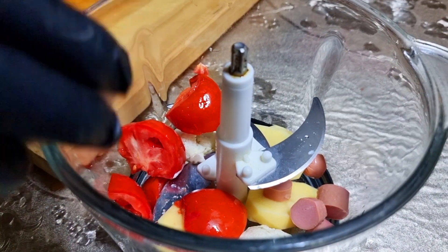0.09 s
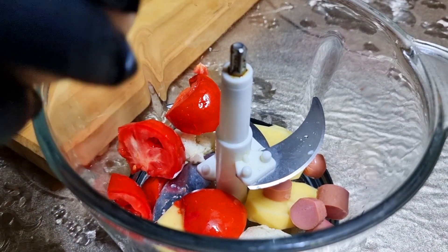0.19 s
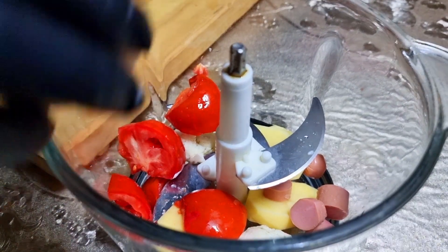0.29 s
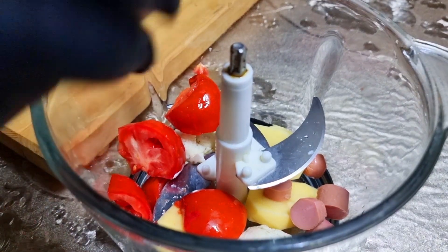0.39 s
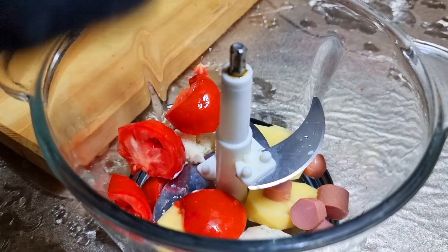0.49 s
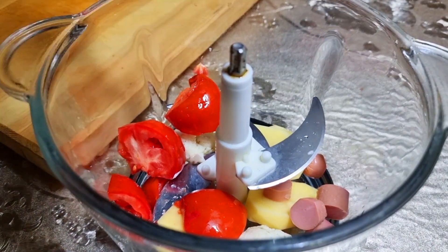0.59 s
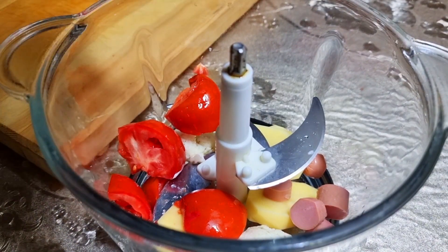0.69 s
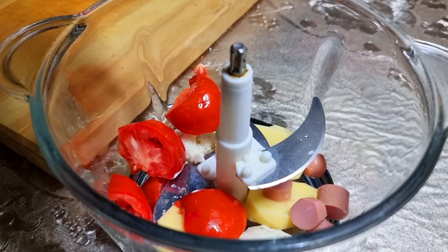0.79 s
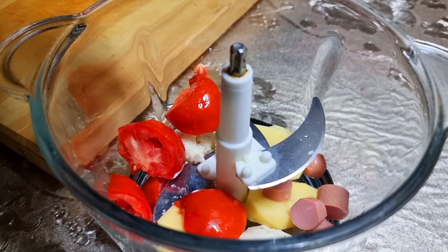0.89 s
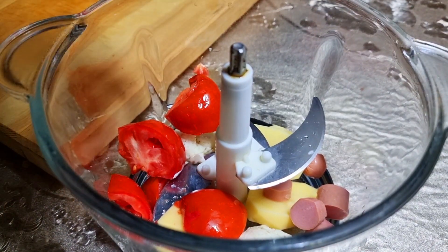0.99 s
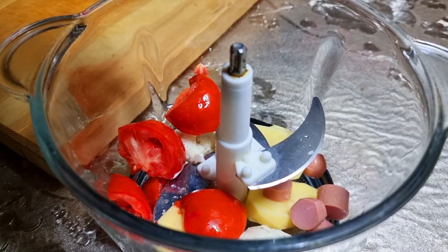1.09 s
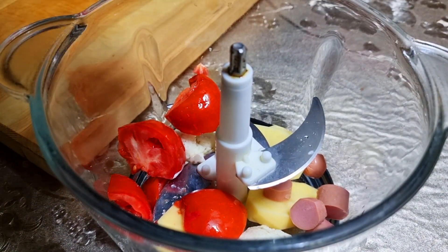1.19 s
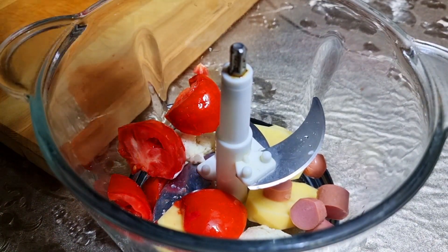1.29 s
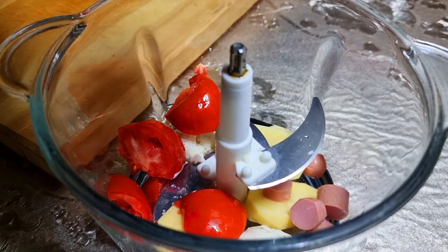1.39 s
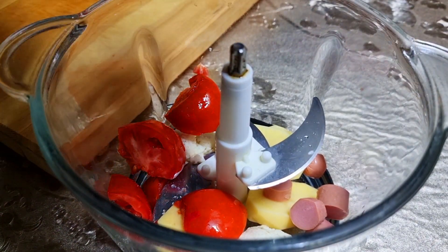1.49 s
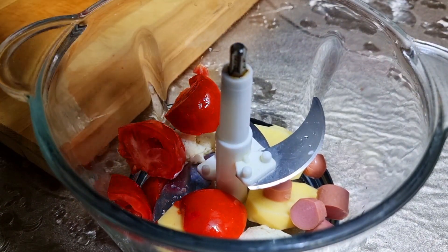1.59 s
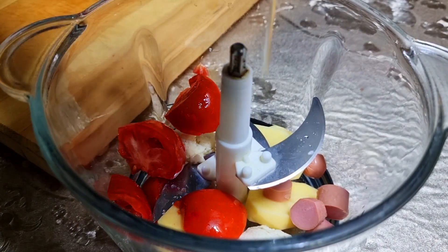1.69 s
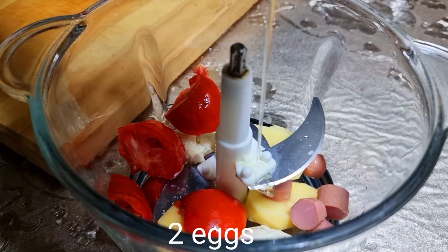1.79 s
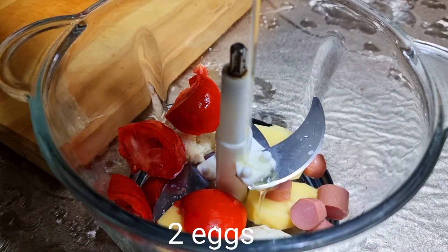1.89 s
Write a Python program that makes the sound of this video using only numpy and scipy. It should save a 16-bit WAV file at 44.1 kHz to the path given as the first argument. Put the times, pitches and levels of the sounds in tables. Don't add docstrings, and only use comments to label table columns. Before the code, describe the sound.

An egg is cracked on a thick glass bowl, close in stereo, in a quiet, slightly echoing kitchen. After a faint sleeve rustle, a dull knock at 0.22 s and a brighter, clickier one at 0.39 s thud the board, rattle loose things and leave the glass ringing with a wavering tone. Cloth brushes softly around 0.8-0.9 s. Shell crackles at 1.26-1.53 s, again near 1.7 s, then snaps sharply at 1.88 s.

```python
import sys
import numpy as np
from scipy import signal
from scipy.fft import rfft, irfft, next_fast_len
from scipy.io import wavfile
from scipy.ndimage import uniform_filter1d

SR = 44100
rng = np.random.default_rng(int(sys.argv[2]) if len(sys.argv) > 2 else 0)


def output_pcm(signal):
    pcm = np.clip(np.atleast_2d(signal).T, -1, 1) * 32767
    wavfile.write(sys.argv[1], SR, np.round(pcm).astype(np.int16))


def ratio(d):
    e = np.asarray(d, float) / 20
    return 10 ** e


N = 83790

# (time [s], click level [dB], thud level [dB], click pitch [Hz])
KNOCKS = [
    (0.2165, -15.5, -18.5, 720),
    (0.3863, -3.5, -19, 9550),
]
FIRST_S, SECOND_S = KNOCKS[0][0], KNOCKS[1][0]
# (pitch [Hz], first knock [dB], second knock [dB], 60 dB decay [s])
BOARD = [(108.7, -9.5, -5.5, 0.4), (154, -21, -15, 0.32), (205.6, -1.5, -7.5, 0.21),
         (234.6, -3, -17.5, 0.21), (390, 0, -11.5, 0.075), (451, -4, -15, 0.087)]
BOARD_SOFT_HZ = 410


def at_hz(points, hz):
    points = np.array(points)
    return np.interp(np.log(hz), np.log(points[:, 0]), points[:, 1])


def rms_one(x):
    return x / np.sqrt(np.mean(x ** 2) + 1e-20)


def since(s):
    t = np.arange(N) / SR - s
    return np.maximum(t, 0), t >= 0


def sos_filter(x, order, hz, kind):
    return signal.sosfilt(signal.butter(order, hz, kind, fs=SR, output="sos"), x)


def soften(x, hz):
    return signal.lfilter(*signal.butter(1, hz, fs=SR), x)


def struck(s, hz, db, t60, pan_db, lead):
    out, i = np.zeros((2, N)), int(s * SR)
    t = np.arange(min(N - i, int(1.6 * t60 * SR))) / SR
    swell = ratio(db - 60 * t / t60) * np.minimum(t / 0.0019, 1)
    sides = ratio(np.array([[pan_db], [-pan_db]]) / 2)
    phase = 2 * np.pi * hz * t + np.array([[lead], [0]])
    out[:, i:i + len(t)] = swell * sides * np.sin(phase)
    return out


def bands():
    # (pitch [Hz], likeness [-1 to 1])
    likeness = [(60, 0.41), (300, 0.94), (1000, 0), (4000, 0.), (12000, 0.)]
    edges = 22 * 2 ** np.arange(0, 10, .5)
    white = rng.standard_normal((2, 2, N))
    for k, (low, high) in enumerate(zip(edges, edges[1:])):
        mid, side = sos_filter(white[k % 2], 2, [low, high], "band")
        hz = np.sqrt(low * high)
        alike = np.clip(at_hz(likeness, hz), -1, 1)
        yield hz, np.sqrt(1 + alike) * mid + np.sqrt(1 - alike) * side * [[1], [-1]]


def colour(x, tone):
    hz = np.maximum(np.arange(1025) * SR / 2048, 20)
    c = irfft(np.log(ratio(at_hz(tone, hz))))
    c[1:1024] *= 2
    c[1025:] = 0
    h = irfft(np.exp(rfft(c)))
    return signal.fftconvolve(x, h[None] / np.sqrt(np.sum(h ** 2)))[:, :N]


def resonate(x, hz, cycles):
    r, w = ratio(-60 * hz / (cycles * SR)), 2 * np.pi * hz / SR
    return signal.lfilter([0, np.sin(w)], [1, -2 * r * np.cos(w), r * r], x)


def kitchen(x):
    t60_s, wall_cut_hz = 0.44, 2900
    size = next_fast_len(N + SR // 2)
    w = 2 * np.pi * np.arange(size // 2 + 1) / size
    dull = 1 / (1 + 1j * w * SR / (2 * np.pi * wall_cut_hz))
    out = np.zeros((2, len(w)), complex)
    for k, lag in enumerate(rng.uniform(0.01, 0.052, 12) * SR):
        loop = ratio(-60 * lag / SR / t60_s) * dull * np.exp(-1j * w * lag)
        out[k % 2] += (-1) ** (k // 2) * loop / (1 - loop)
    return irfft(out * rfft(x, size), size)[:, :N]


def room_air():
    # (pitch [Hz], level per Hz [dB])
    air_tone = [(25, -27), (110, -10.5), (200, -21.5), (500, -13), (840, -5.5), (1700, -10), (4000, -7),
                (9000, -13.5)]
    air_db, top_hz, above_db = -65.5, 11280, -19.5
    air = sum(ratio(at_hz(air_tone, hz)) * noise for hz, noise in bands())
    low = signal.sosfilt(signal.cheby2(10, 50, top_hz, fs=SR, output="sos"), air)
    return ratio(air_db) * rms_one(low + ratio(above_db) * air)


def sleeve():
    # (time [s], level [dB], half width [s])
    strokes = [
        (0.124, -60.5, 0.03),
        (0.38, -51, .004),
        (0.819, -65, 0.026),
        (0.899, -61.5, 0.021),
        (0.914, -56.5, 0.0023),
    ]
    # (pitch [Hz], level per Hz [dB])
    cloth_tone = [(1500, -21), (3000, -6), (4800, 0), (7000, 4), (10000, -16), (15000, -38.5)]
    cloth = sum(ratio(at_hz(cloth_tone, hz) - 30 * (hz < 1000)) * noise for hz, noise in bands())
    t = np.arange(N) / SR
    rubbing = sum(ratio(db) * np.exp(-((t - s) / width) ** 2) for s, db, width in strokes)
    return rubbing * rms_one(cloth)


def bumps():
    # (time [s], level [dB])
    touches = [
        (.1, -66.5),
        (1.282, -69),
    ]
    hz, _, _, t60 = BOARD[0]
    out = sum(struck(s, hz, db, t60 / 2, 0, 0)[0] * np.minimum(since(s)[0] / 0.0058, 1)
              for s, db in touches)
    return soften(out, BOARD_SOFT_HZ)


def rattle():
    # (pitch [Hz], first knock [dB], second knock [dB], 60 dB decay [s])
    shaking = np.array([(59, -44, -41, 0.23), (204, -33, -37, 0.29), (463, -30, -38.5, 0.1),
                        (1192, -27, -27, 0.079), (2430, -43, -28, 0.08), (5060, -57.5, -25.5, 0.088),
                        (8000, -41.5, -31.5, 0.023), (13000, -60.5, -47, 0.041)])
    out = 0
    for hz, noise in bands():
        for k, knock in enumerate(KNOCKS):
            t, on = since(knock[0])
            db = at_hz(shaking[:, [0, 1 + k]], hz) - 60 * t / at_hz(shaking[:, [0, 3]], hz)
            out = out + (hz > 35) * on * ratio(db) * np.minimum(t * hz / 2, 1) * rms_one(noise)
    gap = sos_filter(out, 3, [4500, 5600], "bandstop")
    return np.where(since(SECOND_S)[1], (out + gap) / 2, gap)


def push():
    lag_s, width_s, hz, push_db = .0132, 0.0041, 116, -1.5
    out = 0
    for s, _, thud_db, _ in KNOCKS:
        t = np.arange(N) / SR - s - lag_s
        pulse = np.exp(-(t / width_s) ** 2) * np.cos(2 * np.pi * hz * t)
        out = out + ratio(thud_db + push_db) * pulse
    return out


def board():
    lag_s, wobble_db = 0.0016, 3
    lead_s = 0.0001
    settle_s, settle_db_per_s = 0.48, 147
    settling = settle_db_per_s * since(settle_s)[0]
    out = np.zeros((2, N))
    for k, (hz, *levels, t60) in enumerate(BOARD):
        wobble = rms_one(np.interp(np.arange(N) / SR * 40, np.arange(80), rng.standard_normal(80)))
        lead = 2 * np.pi * hz * lead_s
        thuds = sum(struck(s + lag_s, hz, thud_db + db, t60, 0, lead)
                    for (s, _, thud_db, _), db in zip(KNOCKS, levels))
        out += (-1) ** k * ratio(wobble_db * wobble - settling) * thuds
    return soften(out, BOARD_SOFT_HZ)


def bowl_pair():
    # (pitch [Hz], level [dB], 60 dB decay [s], change at second knock [dB])
    pair = [(829.4, -9, 1.05, -4), (848.3, -21, 1.0, 2)]
    # (left minus right [dB], left lead [radians])
    pair_aim = [(-3.8, -2.86), (2.2, 1.4)]
    lags_s = (0, .00015)
    change = np.minimum(since(SECOND_S)[0] / 0.015, 1)
    out = 0
    for (hz, db, t60, step_db), aim, lag in zip(pair, pair_aim, lags_s):
        out = out + struck(FIRST_S + lag, hz, db, t60, *aim) * ratio(step_db * change)
    return out


def bowl_overtones():
    # (first knock [dB], second knock [dB], 60 dB decay [s])
    glass = [(-36, -26, .56), (-43.5, -33.5, .5), (-29.5, -32, 0.28), (-22, -17.5, 0.21), (-40, -42, 0.11),
             (-38.5, -34, 0.14), (-31, -32, .1), (-32.5, -20, 0.1), (-40, -33.5, .11), (-32.5, -32.5, 0.15),
             (-47, -33.5, .11), (-36.5, -26.5, 0.1), (-35.5, -29, 0.11), (-54, -29, 0.11)]
    # (pitch [Hz], left minus right [dB], left lead [radians])
    glass_aim = [(2029, 4.2, -1.9), (2194.7, -4, -.1), (3644.5, -18, -2.0), (4093.3, -18, -2.1),
                 (5728, -8, .2), (6185.5, -10.5, -.5), (6540, -4, -1), (7091.5, 1.5, 1.3), (7321, 0, .5),
                 (7581, -6, -1), (7975, 2, 1), (8422.5, 6.5, -2.16), (9248, 1.5, 1.6), (9389, 5, -1.7)]
    # (first knock [dB], second knock [dB], 60 dB decay [s])
    thin = [(-42, -33, 0.035), (-60.5, -41.5, 0.07), (-53, -51, .08), (-57, -29, 0.096), (-38, -46, .05),
            (-50.5, -56, .07), (-54, -57, .08), (-69, -43, .06), (-68.5, -48, .07)]
    thin_hz = [11450, 11950, 12590, 7903, 1825, 13290, 13990, 14670, 15060]
    # (pitch [Hz], first [dB], second [dB], 60 dB decay [s])
    crowd = np.array([(5585, -49, -35, .07), (7500, -41.5, -36, 0.028), (10000, -41.5, -41, 0.021)])
    modes = [(hz, *row, pan_db, lead) for row, (hz, pan_db, lead) in zip(glass, glass_aim)]
    modes += [(hz, *row, *rng.normal(0, [3, .8])) for hz, row in zip(thin_hz, thin)]
    for place, a, b, c, d in rng.standard_normal((26, 5)):
        hz = crowd[0, 0] + (crowd[-1, 0] - crowd[0, 0]) * (place * 10 % 1)
        first_db, second_db, t60 = (at_hz(crowd[:, [0, k]], hz) for k in (1, 2, 3))
        modes.append((hz, first_db + 4 * a, second_db + 4 * b, t60, 2 * c, d))
    out = 0
    for hz, first_db, second_db, *rest in modes:
        out = out + struck(FIRST_S, hz, first_db, *rest) + struck(SECOND_S, hz, second_db, *rest)
    return out


def contact():
    out = np.zeros((2, N))
    fade = np.exp(-np.arange(600) / SR / .0004)
    for s, db, _, hz in KNOCKS:
        i = int(s * SR)
        burst = [[1, .6], [1, -.6]] @ rng.standard_normal((2, 600)) * fade
        ring = resonate(resonate(burst, hz, 16.0), hz, 8.0)
        out[:, i:i + 600] += ratio(db) * ring / np.abs(ring).max()
    return out


def shell():
    crack_s = [1.2638, 1.266, 1.2772, 1.2832, 1.3015, 1.361, 1.4065, 1.4132, 1.4197, 1.4337, 1.458, 1.468,
               1.4868, 1.4885, 1.4985, 1.503, 1.509, 1.526, 1.6885, 1.7098, 1.7143, 1.7185, 1.727, 1.7578,
               1.8761, 1.881, 1.8975]
    # (peak [dB], ringing pitch [Hz], length [s], ring level [dB])
    cracks = [(-44.5, 2700, 0.00073, 11), (-42, 3700, .0008, 1), (-24.5, 6500, 0.0035, -6),
              (-27, 2960, 0.0038, 0.5), (-48, 3000, 0.0017, 2), (-39.5, 7240, 0.0019, 16),
              (-44, 3400, .0012, -8), (-33, 2550, 0.0025, 0), (-37.5, 2600, 0.0017, -10),
              (-34, 3250, 0.0034, -6), (-46.5, 1200, .001, 5), (-49, 3400, 0.0028, -4),
              (-26, 5170, 0.00045, -3), (-25.5, 2030, 0.0035, -5.5), (-33.5, 1510, 0.0024, -14),
              (-32, 4500, 0.0034, -6), (-38.5, 2100, 0.0034, 1), (-42.5, 2400, 0.0025, 3),
              (-74.5, 8000, 0.0011, -5), (-32, 2400, 0.00097, -7), (-27.5, 4200, 0.0031, 1.5),
              (-29.5, 6400, 0.006, -20), (-35.5, 1400, 0.0013, 3), (-48, 5500, .001, 4),
              (-12, 2390, 0.00045, -2), (-27.5, 3620, 0.0014, 3), (-28.5, 3100, 0.0027, 8)]
    # (start [s], low left minus right [dB], share of ring time, lowest [Hz])
    runs = [
        (1.2, 6.5, 0.22, 500),
        (1.4, 9, 0.25, 550),
        (1.48, 4, 0.55, 328),
        (1.6, 7.5, 1.3, 331),
        (1.8, -10, 1.3, 1460),
    ]
    # (pitch [Hz], level per Hz [dB])
    run_tones = [
        [(290, -47), (500, -31), (1190, -12.5), (1720, -13), (2850, -11), (3750, -10), (6060, 3.5), (10400, -8),
         (16000, -36)],
        [(290, -39), (500, -19), (988, -6), (1980, -9), (2770, 1.5), (3700, -13), (5550, -3), (10100, -8.5),
         (16000, -42)],
        [(180, -46), (300, -20.5), (1480, -2.5), (1720, -9.5), (3190, -1), (3520, -4), (5160, -4),
         (10600, -17.5), (16000, -38)],
        [(180, -40), (300, -22.5), (1360, -13.5), (3890, -22.5), (4230, -5), (6000, -3), (6960, -16.5),
         (10200, -13.5), (16000, -60)],
        [(900, -27), (2200, -8), (3600, -5.5), (4300, -18), (5200, -2), (7200, -11.5), (9500, -9.5),
         (12000, -26.5)],
    ]
    splinters_per_s, splinter_db, own_db = 10000, -7.5, 3
    ring_db, ring_s, after_db, after_s = -5, 0.022, -9.5, 0.0074
    low_share = 0.084
    pan_below_hz = 4300
    out, t = np.zeros((2, N + 4000)), np.arange(4000) / SR
    for s, (db, hz, length, more_ring_db) in zip(crack_s, cracks):
        run = sum(s > row[0] for row in runs) - 1
        _, pan_db, ring_share, lowest_hz = runs[run]
        draw = rng.random((3, 4000))
        shower = (draw[0] < splinters_per_s / SR) * np.log(draw[1]) * np.sign(draw[2] - .5)
        fade = np.exp(-t / max(length, .0005)) + ratio(after_db) * np.exp(-t / after_s)
        snap = ratio(splinter_db) * shower * fade
        snap[0] = 3
        strength = np.sqrt(uniform_filter1d(snap ** 2, size=20).clip(0))
        snap = snap + ratio(own_db) * rng.standard_normal((2, 4000)) * strength
        cycles = ring_share * ring_s * hz * min(hz / 4000, 1)
        ring = rms_one(resonate(snap * (t < 2 * length), hz, cycles))
        hit = rms_one(colour(snap, run_tones[run])[:, :4000]) + ratio(ring_db + more_ring_db) * ring
        hit = sos_filter(hit, 4, lowest_hz + low_share * min(hz, 3000), "high")
        hit = hit + soften(hit, pan_below_hz) * (ratio(np.array([[.5], [-.5]]) * pan_db) - 1)
        i = int(s * SR)
        out[:, i:i + 4000] += ratio(db) * hit / np.abs(hit.mean(0)).max()
    return out[:, :N]


def scene():
    port_lag_s, board_low_hz, kitchen_db = -0.00008, 71, -28
    near = contact() + shell()
    near[0] = np.interp(np.arange(N) - port_lag_s * SR, np.arange(N), near[0])
    wood = sos_filter(board() + bumps() + push(), 2, board_low_hz, "high")
    noises = room_air() + sleeve() + rattle()
    echoes = ratio(kitchen_db) * kitchen(near[1])
    return near + bowl_pair() + bowl_overtones() + wood + noises + echoes


def low_pass(x):
    return signal.sosfilt(signal.butter(12, 16490, fs=SR, output="sos"), x)


def record(dry):
    cut = signal.cheby2(12, 60, 16450, fs=SR, output="sos")
    rounded = 1.7 * np.tanh(dry / 1.53)
    return low_pass(signal.sosfilt(cut, rounded))


dry = scene()
out = record(dry)
output_pcm(out)
```